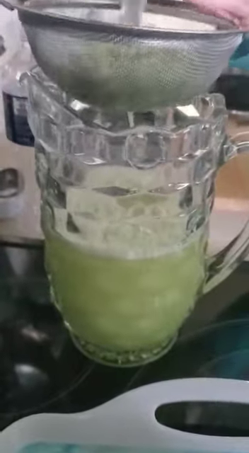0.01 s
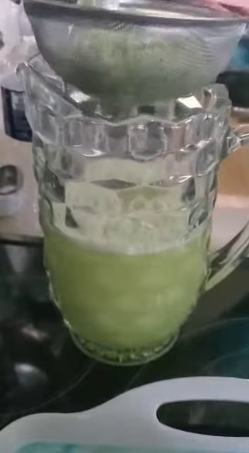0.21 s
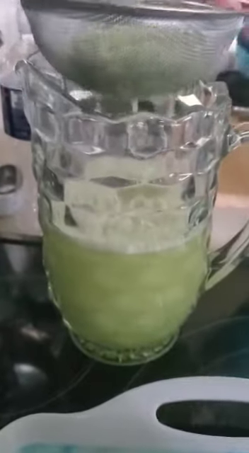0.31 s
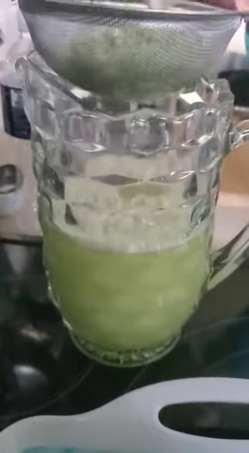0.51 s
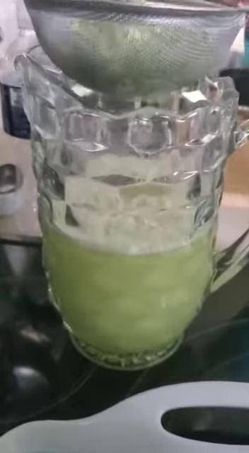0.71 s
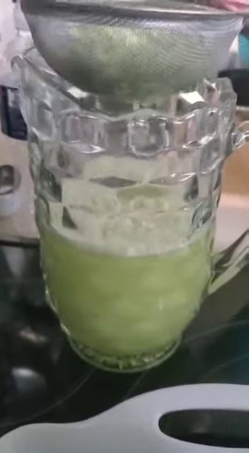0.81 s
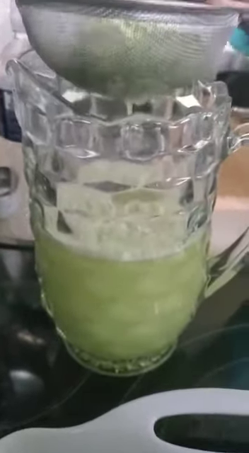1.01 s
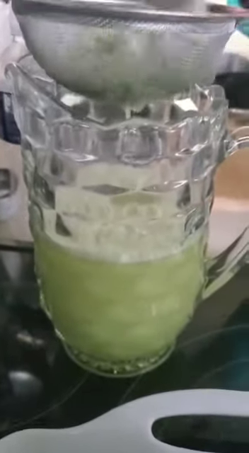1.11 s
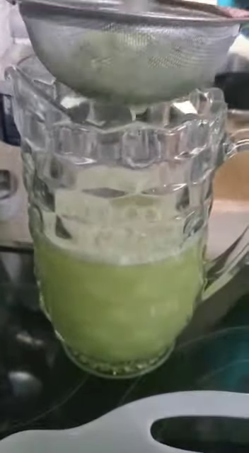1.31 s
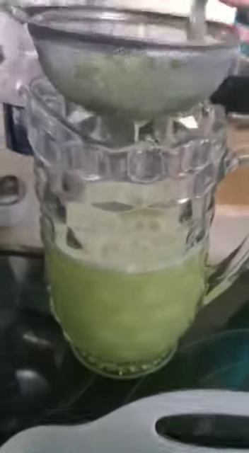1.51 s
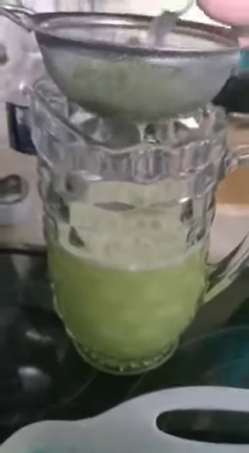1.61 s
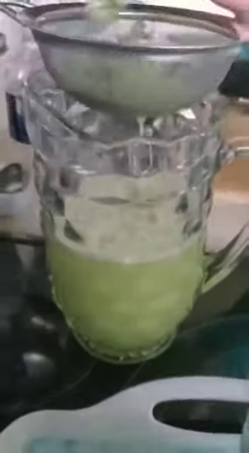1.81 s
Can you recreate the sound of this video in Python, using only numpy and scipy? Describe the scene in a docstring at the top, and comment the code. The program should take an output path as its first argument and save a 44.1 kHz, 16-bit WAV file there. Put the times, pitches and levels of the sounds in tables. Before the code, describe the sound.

Metal spoon stirring and scraping wet pulp in a wire strainer, with juice dripping into glass below

```python
"""A small kitchen, miked in stereo from close by, with a low rumble and faint hiss underneath.
A spoon stirs wet pulp in a wire strainer, knocks and ticks on the wire, and scrapes in quick strokes:
clicks and friction noise drive the ringing modes of the strainer, and its bowl groans.
Juice drips into a glass pitcher below: bubbles ring with rising pitch, drops slap and a trickle hums.
A soft low bump comes near the end."""
import sys
import numpy as np
from scipy import signal
from scipy.io import wavfile
from scipy.ndimage import uniform_filter1d

SR = 44100
rng = np.random.default_rng(int(sys.argv[2]) if len(sys.argv) > 2 else 0)


def int16_out(signal):
    """Quantize to a 16-bit WAV file."""
    q = np.round(np.clip(np.atleast_2d(signal).T, -1, 1) * 32767)
    wavfile.write(sys.argv[1], SR, q.astype(np.int16))


N = 81585
T = np.arange(N) / SR


def amp(db):
    """Decibels to gain."""
    return 10 ** (np.asarray(db) / 20)


def evened(x):
    """Scales to unit rms."""
    return x / np.sqrt(np.mean(x ** 2) + 1e-20)


def dying(t, t60):
    """Exponential decay that falls 60 dB in t60."""
    return np.exp(-np.log(1000) * t / t60)


def pan(db):
    """Left and right gains for a level difference; positive is louder on the left."""
    return amp(np.array([[db], [-db]]) / 2)


def convolve(x, response):
    """Convolution along time, cut to the scene's length."""
    return signal.fftconvolve(np.atleast_2d(x), np.atleast_2d(response), axes=1)[:, :N]


def read(points, hz):
    """Reads a spectrum on a log-frequency axis."""
    f, value = np.transpose(points)
    return np.interp(np.log(hz + 1), np.log(f), value)


def colour(x, points, size=8192):
    """Causal (minimum-phase) filter of unit energy with the shape of the given spectrum."""
    log_gain = np.log(amp(read(points, abs(np.fft.fftfreq(size, 1 / SR)))))
    spectrum = np.exp(np.conj(signal.hilbert(log_gain)))
    taps = np.fft.ifft(spectrum).real[:size // 2]
    return convolve(x, taps / np.linalg.norm(taps))


def clicks(rows):
    """One impulse for each (start_s, level_db) row."""
    out = np.zeros(N)
    for start, db in rows:
        out[round(start * SR)] += amp(db)
    return out


def ring(force, modes):
    """Modes that a force sets ringing, each scaled by its gain at resonance."""
    t = T[:SR // 2]
    response = 0
    for hz, db, t60, side in modes:
        unit_peak = 2 * np.log(1000) / (t60 * SR)
        wave = dying(t, t60) * np.cos(2 * np.pi * hz * t)
        response = response + pan(side) * amp(db) * unit_peak * wave
    return convolve(force, response)


def strokes(rows, rise, release):
    """Strength of a driven sound: quick rise, changing hold, release; rows add as power."""
    power = 0
    for start, length, db, fade_db in rows:
        t = T - start
        attack = np.clip(t / rise, 0, 1)
        hold = amp(db + fade_db * np.clip(t / length, 0, 1))
        let_go = np.exp(-np.maximum(t - length, 0) / release)
        power = power + (attack * hold * let_go) ** 2
    return np.sqrt(power)


def friction(rate, spread_db, rub_db):
    """Slips of uneven size, at a mean rate per second, over a smooth rub."""
    size = amp(spread_db * np.minimum(rng.exponential(1, N), 4))
    slips = size * rng.choice([-1, 1], N) * (rng.random(N) < rate / SR)
    return evened(evened(slips) + amp(rub_db) * rng.standard_normal(N))


def chatter(rows, t60, buzz_db):
    """Each contact is a click followed by a brief buzz of the wires."""
    hits = clicks(rows)
    keep = dying(2 / SR, t60)  # power falls a millionfold in t60, so the buzz drops 60 dB in t60
    buzz_power = signal.lfilter([1], [1, -keep], hits ** 2) * (1 - keep)
    buzz = np.sqrt(buzz_power) * rng.standard_normal((2, N))
    return (hits + amp(buzz_db) * buzz) / np.hypot(1, amp(buzz_db))


def hum(hz, waver):
    """A tone of unit rms whose pitch wanders by the rms fraction waver."""
    drift = uniform_filter1d(uniform_filter1d(rng.standard_normal(N), size=900), size=500)
    turns = np.cumsum(hz * (1 + waver * evened(drift))) / SR
    return np.sqrt(2) * np.sin(2 * np.pi * turns)


EARLY_T60_S = .032


def near_echoes():
    """A dying burst of dense echoes with unit energy."""
    t = T[:SR // 4]
    burst = rng.standard_normal((2, len(t))) * dying(t, EARLY_T60_S)
    return burst / np.linalg.norm(burst, axis=1, keepdims=True)


# reverberation time of the kitchen: pitch_hz, t60_s
ROOM_DECAY = [(200, 0.95), (1000, 0.3), (4000, .3), (9000, 0.28), (16000, 0.21)]
ROOM_BUILD_S = 0.0059


def room_tail():
    """Reverberation of unit energy: noise whose bands die at their own rates, treble first."""
    hz, t, z = signal.stft(rng.standard_normal((2, SR // 2)), SR, nperseg=256)
    out = signal.istft(z * dying(t, read(ROOM_DECAY, hz)[:, None]), SR)[1]
    out *= np.minimum(T[:out.shape[1]] / ROOM_BUILD_S, 1)
    return out / np.linalg.norm(out, axis=1, keepdims=True)


ECHO_SHIFT_PER_S = 22


def echoes(x, make_response, count=3):
    """Echo patterns that blend into each other as the spoon and strainer move."""
    turn = 2 * np.pi * ECHO_SHIFT_PER_S * T
    out = 0
    for k in range(count):
        weight = np.sqrt(2 / count) * np.cos(turn + np.pi * k / count)
        out = out + convolve(x * weight, make_response())
    return out


RIGHT_LATE_S = 0.00023


def kitchen(x, early_db, room_db):
    """Direct sound reaches the left microphone first; near echoes and a short tail join it."""
    late = round(RIGHT_LATE_S * SR) / SR
    direct = np.array([x[0], np.interp(T - late, T, x[1])])
    wet = amp(early_db) * echoes(x, near_echoes) + amp(room_db) * echoes(x, room_tail)
    return (direct + wet) / np.sqrt(1 + amp(early_db) ** 2 + amp(room_db) ** 2)


# spectra of the low rumble and the hiss: pitch_hz, level_db (relative)
RUMBLE_COLOUR = [(15, -33), (35, -5), (52, 1.5), (78, 2), (120, -8), (200, -16), (400, -23), (900, -40)]
HISS_COLOUR = [(100, -7), (400, -0.5), (800, -10), (3000, -12.5), (7000, -21), (10000, -10.5), (16000, -10)]
# swell of the rumble: start_s, level_db
RUMBLE_LEVEL = [(0, -59), (0.05, -70), (0.3, -69), (0.62, -70.5), (0.72, -78.5), (0.85, -80.5),
                (0.93, -64.5), (1.03, -73.5), (1.5, -75.5), (1.64, -64.5), (1.72, -61.5), (1.78, -62.5),
                (1.85, -60)]
RUMBLE_LIKENESS, RUMBLE_PAN_DB = 0.64, -5.5  # correlation of left and right; right is louder
HISS_DB = -75


def background():
    """Filtered noise: a low rumble, partly alike in both channels, that swells, and faint hiss."""
    a, b = rng.standard_normal((2, N))
    right = RUMBLE_LIKENESS * a + np.sqrt(1 - RUMBLE_LIKENESS ** 2) * b
    rumble = evened(colour(np.array([a, right]), RUMBLE_COLOUR))
    swell = amp(np.interp(T, *np.transpose(RUMBLE_LEVEL)))
    hiss = colour(rng.standard_normal((2, N)), HISS_COLOUR)
    return pan(RUMBLE_PAN_DB) * rumble * swell + amp(HISS_DB) * hiss


# soft stirring of the pulp: start_s, length_s, level_db (before the room), fade_db (change over the stroke)
STIRS = [(0.0, 0.032, -63, 2), (0.05, 0.3, -72.5, -8), (0.35, 0.21, -56, -21), (0.58, 0.11, -59.5, -8),
         (0.68, 0.02, -64, 0.5), (1.17, 0.14, -66, 8.5), (1.535, 0.2, -59.5, -5.5)]
# spectrum of the stirring: pitch_hz, level_db (relative)
STIR_COLOUR = [(200, -41.5), (600, -18), (1000, -21.5), (2800, -9), (4500, -7), (7000, -1), (9200, 4.5),
               (11000, 3), (12500, 4.5), (16000, 4)]


def stirring():
    """Wet pulp rubs and slips under the spoon in fine, uneven grains."""
    pressure = strokes(STIRS, rise=0.0033, release=0.027)
    return colour(pressure * friction(rate=2900, spread_db=8.5, rub_db=-2.5), STIR_COLOUR)


BUBBLE_RISE, BUBBLE_ONSET_CYCLES = .03, .6  # pitch rise as a fraction; time constant of the onset


def bubble(start, db, hz, cycles):
    """A trapped bubble rings and dies, 60 dB in the given cycles, while its pitch rises."""
    age = np.maximum(T - start, 0) * hz  # in cycles
    pitch = hz * (1 + BUBBLE_RISE * np.minimum(age / cycles, 1))
    turns = np.cumsum(pitch * (age > 0)) / SR
    decay = dying(np.minimum(age, 4 * cycles), cycles)
    onset = 1 - np.exp(-age / BUBBLE_ONSET_CYCLES)
    wave = np.sin(2 * np.pi * turns) * decay * onset
    return amp(db) * wave / (np.linalg.norm(wave) + 1e-12)


# drips that trap a bubble: start_s, level_db (before the room), pitch_hz (at the start), ring_cycles
DRIPS = [(0.058, -39, 4480, 31), (0.065, -42, 4600, 9.6), (0.0986, -35, 1840, 21),
         (0.1185, -41.5, 1790, 19), (0.255, -27.5, 1885, 150), (0.3787, -28, 2990, 7.3),
         (0.379, -36, 3180, 610), (0.384, -34, 1410, 35), (0.433, -28.5, 2590, 84),
         (0.434, -31.5, 4500, 13), (0.442, -33.5, 1910, 26), (0.4902, -38, 2720, 5),
         (0.5174, -40, 1810, 130), (0.9705, -19.5, 2970, 46), (0.977, -27, 1900, 25),
         (0.9978, -23, 1895, 97), (1.028, -23, 2510, 7.3), (1.034, -20, 1802, 110), (1.133, -28, 3000, 19),
         (1.2325, -32.5, 2230, 44), (1.2821, -29.5, 1855, 240), (1.324, -33, 5400, 36),
         (1.3395, -23, 2770, 24), (1.3395, -29, 5800, 3.4), (1.349, -25, 2830, 16), (1.349, -31, 3680, 29),
         (1.383, -31, 2270, 8.8), (1.393, -43.5, 2720, 11), (1.395, -30, 1866, 130),
         (1.4223, -33.5, 5590, 25), (1.428, -36.5, 1806, 49), (1.437, -35, 2635, 61),
         (1.445, -43.5, 1790, 30), (1.5218, -37.5, 3100, 3.2), (1.5427, -33.5, 4400, 6.8),
         (1.5875, -37, 5300, 30), (1.72, -32.5, 2003, 170), (1.74, -45, 1920, 7.7),
         (1.758, -39.5, 1620, 57), (1.772, -48, 1910, 37), (1.8012, -43.5, 1880, 35)]
SHED_DB, SHED_OCTAVES, SHED_SPREAD_S = -14, .3, .024  # level against the drip, pitch scatter, latest delay


def drips():
    """Each drip rings a bubble and sheds five weaker, later ones of scattered pitch."""
    out = np.zeros(N)
    for start, db, hz, cycles in DRIPS:
        out += bubble(start, db, hz, cycles)
        for late, detune in rng.random(size=(5, 2)):
            shed_hz = hz * 2 ** (SHED_OCTAVES * (2 * detune - 1))
            out += bubble(start + SHED_SPREAD_S * late, db + SHED_DB, shed_hz, cycles / 2)
    return out


# the spoon lands and chatters: start_s, level_db (before buzz and room)
KNOCKS = [(0.2009, 4), (0.2016, 6.5), (0.2052, -0.5), (0.2070, -5.5)]
# spectrum of the knock's force: pitch_hz, level_db (relative)
KNOCK_COLOUR = [(150, -73), (330, -27.5), (620, -14), (1100, -26), (1900, -23.5), (3300, -18.5),
                (4150, -23.5), (4700, -20), (6200, -22.5), (8100, -6), (10000, -9.5), (12200, -4.5),
                (15500, -4)]


def knocking():
    """The spoon lands on the wire in a few rapid contacts that buzz."""
    return colour(chatter(KNOCKS, t60=.013, buzz_db=4), KNOCK_COLOUR)


# the bowl is driven to sing: start_s, length_s, level_db, fade_db (change over the groan), pitch_hz
GROANS = [(0.2, 0.06, -52, -16, 602), (0.601, 0.091, -75, -21, 611), (0.933, 0.039, -58.5, 1.5, 596.2),
          (1.046, 0.024, -49, -13.5, 607), (1.1, 0.021, -54.5, -4, 600), (1.61, 0.11, -82.5, -11, 608)]


def bowl_groans():
    """The spoon makes the strainer's bowl sing in its lowest mode, a wavering tone on the left."""
    bowl = 0
    for *row, hz in GROANS:
        bowl = bowl + strokes([row], rise=0.0073, release=0.016) * hum(hz, waver=0.0112)
    return pan(18) * bowl


# heavier drops that slap the juice: start_s, level_db (before the room)
SLAPS = [(0.3785, -47.5), (0.402, -41.5), (1.10, -35.5), (1.277, -40.5), (1.297, -41.5), (1.34, -44)]
# spectrum of a slap: pitch_hz, level_db (relative)
SLAP_COLOUR = [(150, -12), (400, 0), (700, -3), (1300, 0), (2400, -2), (3500, -8), (14000, -22)]
# resonances of the air in the pitcher: pitch_hz, gain_db, t60_s, left_right_db
PITCHER = [(402, 24, .35, 0), (970, 20, .17, 4), (1250, 21, .14, 3), (1860, 21, .12, 0), (2280, 23, .16, 0)]


def slaps():
    """Drops hit the juice as short filtered clicks that sound the air in the pitcher."""
    hits = colour(clicks(SLAPS), SLAP_COLOUR)
    return hits + ring(hits, PITCHER)


def juice():
    """Drips and slaps, heard mostly by way of the glass walls and less from the room."""
    return kitchen(pan(-4) * (drips() + slaps()), early_db=5, room_db=-1.5)


# a thin trickle drives the pitcher's air: start_s, length_s, level_db, fade_db (change over the trickle)
TRICKLES = [(0.385, 0.099, -67.5, -2.5), (0.67, 0.026, -71.5, -5.5), (0.96, 0.21, -65, -6.5),
            (1.278, 0.023, -56.5, -5), (1.68, 0.14, -73, -5.5)]


def trickle_hum():
    """A thin trickle keeps the pitcher's air humming in its lowest mode."""
    return strokes(TRICKLES, rise=0.033, release=0.027) * hum(PITCHER[0][0], waver=0.0207)


# light ticks of the spoon on the wire: start_s, level_db (before buzz and room)
TICKS = [(0.4095, -24.5), (0.4335, -28.5), (0.4853, -35), (0.4923, -29.5), (0.5806, -34), (0.6275, -34),
         (0.6690, -35), (1.0025, -23.5), (1.3935, -30.5), (1.4215, -38), (1.5415, -36.5), (1.6263, -43),
         (1.7085, -30), (1.7814, -33)]
# spectrum of the ticks: pitch_hz, level_db (relative)
TICK_COLOUR = [(300, -4), (1500, -21), (4000, -15.5), (6500, 1.5), (9000, 6.5), (12000, 4.5), (16000, -3.5)]


def ticking():
    """Light contacts on the wire, mostly buzz."""
    return colour(chatter(TICKS, t60=0.015, buzz_db=10), TICK_COLOUR)


# strokes over the mesh: start_s, length_s, level_db (before the room), fade_db (change over the stroke)
SCRAPES = [(0.9195, 0.0058, -46.5, -1.5), (0.9285, 0.034, -41.5, -7), (1.042, 0.046, -38.5, -6.5),
           (1.095, 0.021, -44, -0.5), (1.137, 0.007, -46, -10)]
# spectrum of the scraping: pitch_hz, level_db (relative)
SCRAPE_COLOUR = [(150, -31.5), (380, -9), (620, -3.5), (820, -4.5), (1300, -11.5), (2400, -5), (4100, -7),
                 (4700, -9.5), (5600, -7.5), (8300, -0.5), (13300, 1), (16000, -6)]


def scraping():
    """The spoon slips from wire to wire, about 800 a second, over a smooth rub."""
    pressure = strokes(SCRAPES, rise=0.00064, release=0.0056)
    return colour(pressure * friction(rate=800, spread_db=4, rub_db=-3), SCRAPE_COLOUR)


MESH_LOW_HZ, MESH_HIGH_HZ, MESH_DB, MESH_T60_S = 1250, 5600, 7.5, .2


def mesh_modes(count=44):
    """Many close modes of the wire mesh: a dense metallic ring in the mids."""
    modes = []
    for place, side in rng.random((count, 2)):
        hz = MESH_LOW_HZ * (MESH_HIGH_HZ / MESH_LOW_HZ) ** place
        modes.append((hz, MESH_DB, MESH_T60_S, 20 * (side - .5)))
    return modes


# what the strainer rings with: pitch_hz, gain_db, t60_s, left_right_db
STRAINER = [(611.4, 6.5, 0.14, 7.5), (1407, 11, 0.13, 2), (1879, 10.5, 0.16, -4), (2549, 17, 0.1, -2),
            (3240, 2, 0.085, -3), (3550, 1, .25, 2.5), (4670, 8.5, 0.087, -0.5), (4990, -2, .15, 5.5),
            (5220, 7.5, 0.11, -2.5), (8560, 1.5, 0.14, -7), (9600, -4, 0.13, -3.5), (12200, 3.5, 0.17, -4),
            (13330, 9, 0.053, 8)]


def spoon():
    """Knock, ticks, scrapes and stirring, with their room sound, drive the same strainer."""
    force = knocking() + ticking() + scraping() + stirring()
    contact = kitchen(pan(-1.5) * force, early_db=2.5, room_db=0)
    # the mesh rings in opposite phase to the other modes
    return contact + ring(contact, STRAINER) - ring(contact, mesh_modes())


# a soft low bump: start_s, level_db
BUMPS = [(1.827, -30)]
# spectrum of the bump: pitch_hz, level_db (relative)
BUMP_COLOUR = [(30, -21), (90, 0), (280, -10.5), (500, -23), (1000, -35), (4000, -72)]


def bump():
    """A click filtered down to a soft low thud."""
    return colour(clicks(BUMPS), BUMP_COLOUR)


def scene():
    """Spoon and juice in the kitchen, over the background."""
    return spoon() + juice() + bowl_groans() + trickle_hum() + bump() + background()


EDGE_HZ = 15900


def record(dry):
    """The recorder's band limit: a steep low-pass."""
    taps = signal.firwin(255, EDGE_HZ, window=("kaiser", 8), fs=SR)
    return signal.oaconvolve(dry, taps[None], "same")


dry = scene()
out = record(dry)
int16_out(out)
```